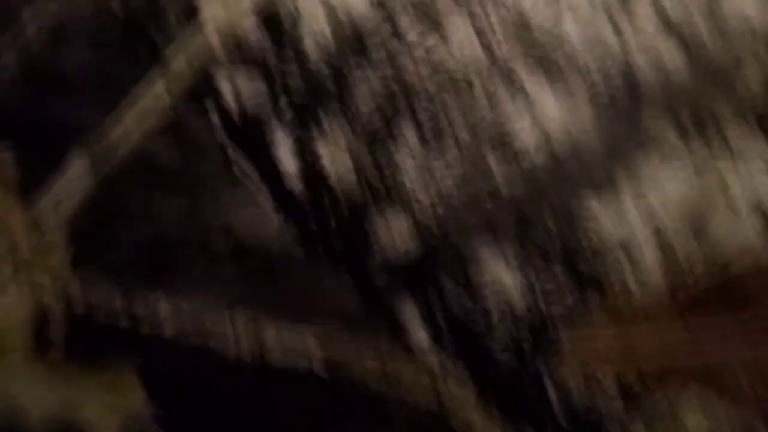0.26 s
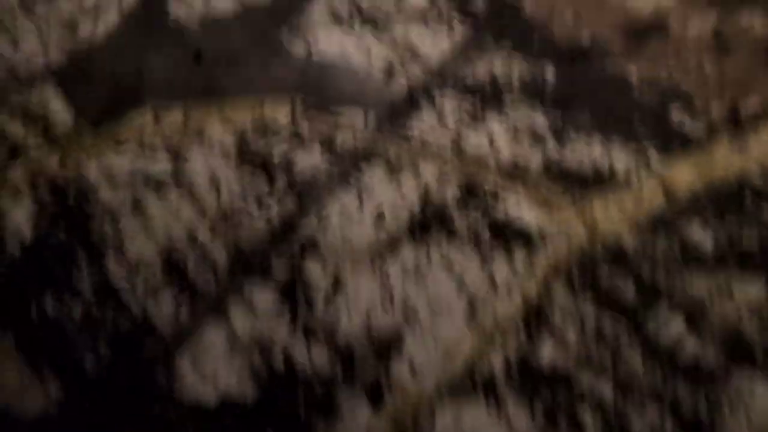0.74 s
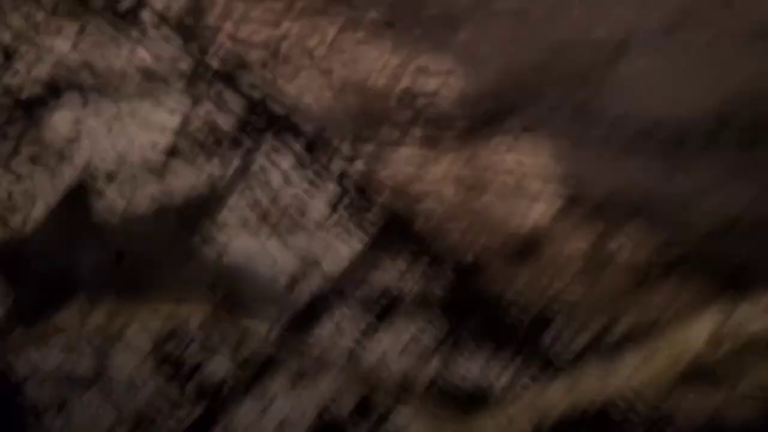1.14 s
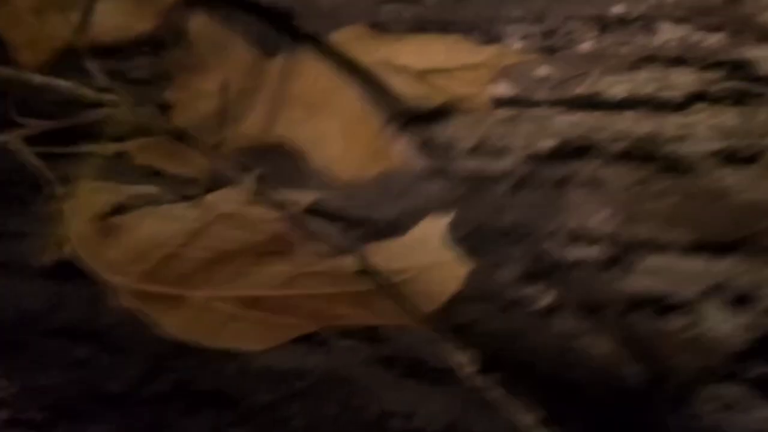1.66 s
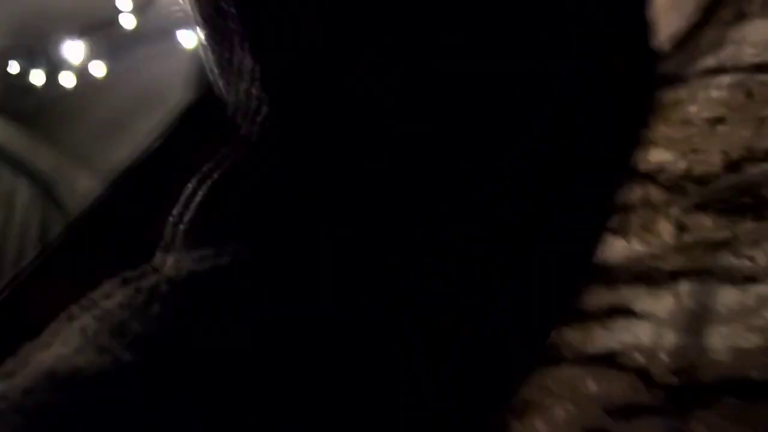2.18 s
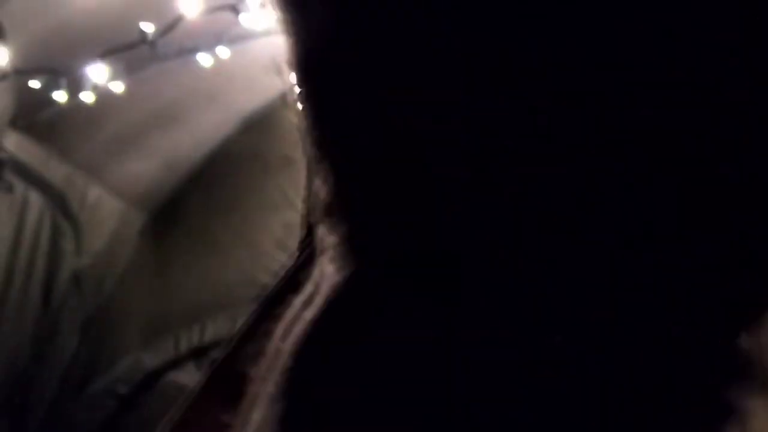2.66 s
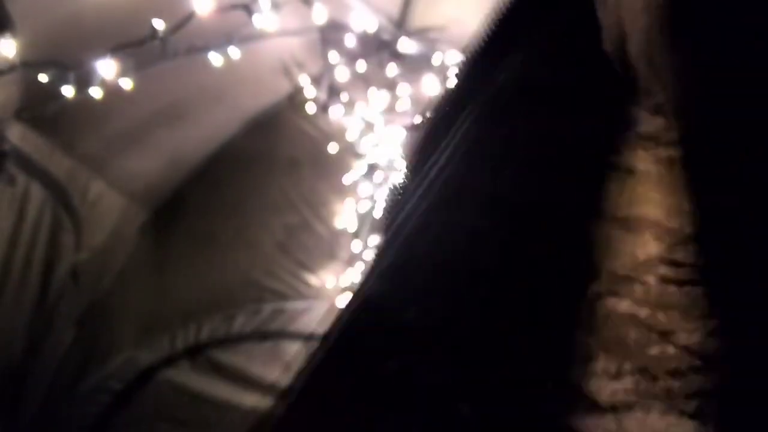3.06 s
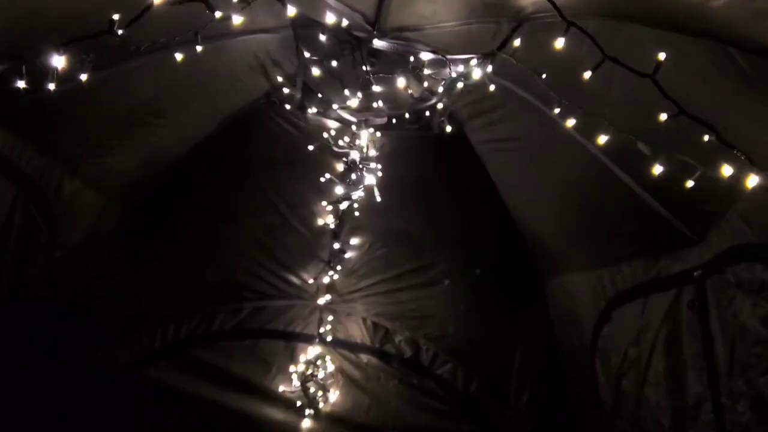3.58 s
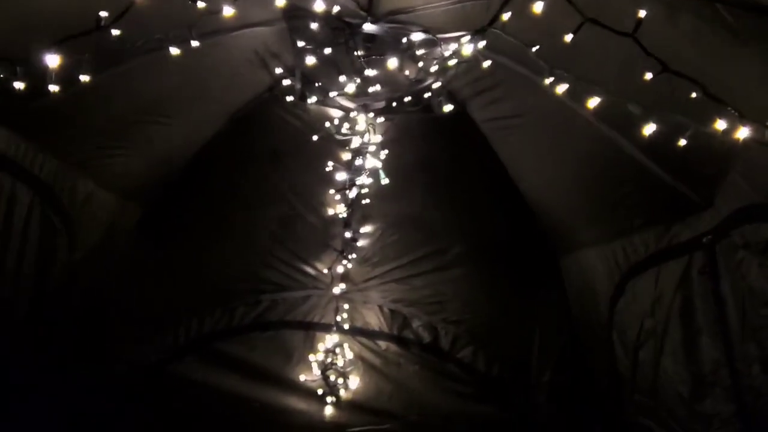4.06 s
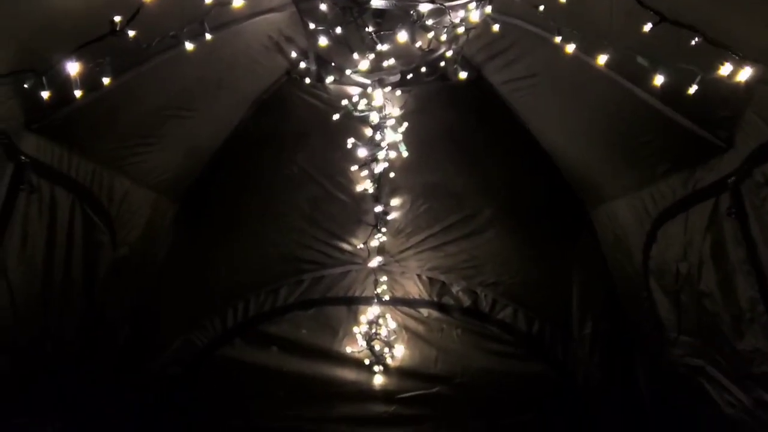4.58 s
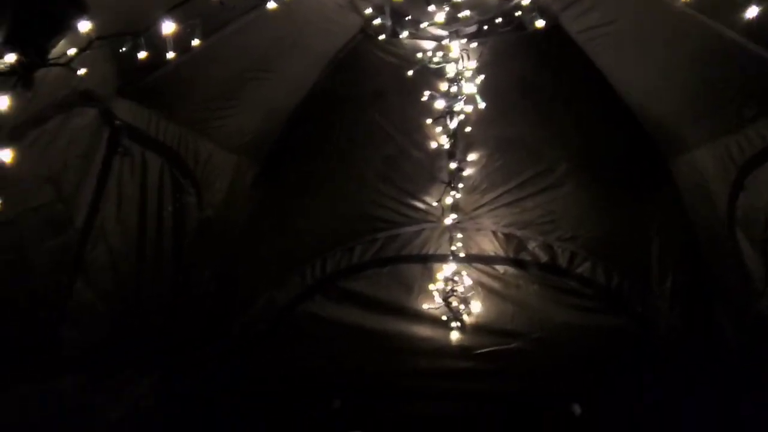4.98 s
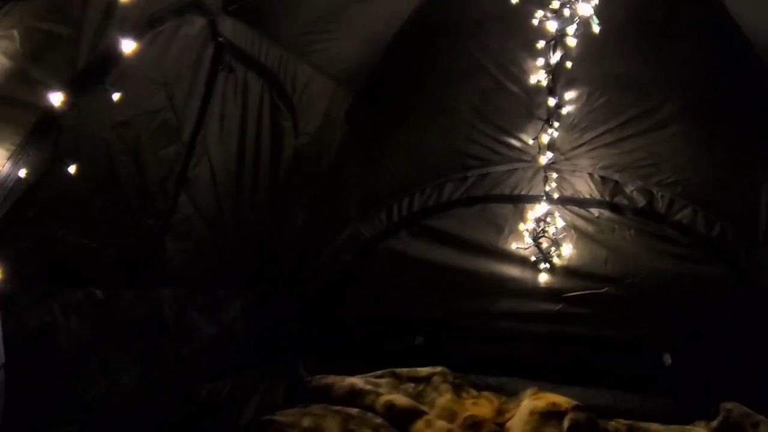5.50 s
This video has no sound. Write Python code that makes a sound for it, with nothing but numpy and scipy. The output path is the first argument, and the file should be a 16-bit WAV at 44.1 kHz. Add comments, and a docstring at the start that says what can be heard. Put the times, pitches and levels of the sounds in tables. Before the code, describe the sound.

A tent door zipper is pulled open in one fast buzzing zip, then slower, rougher pulls, with fabric rustling and flapping.

```python
"""A tent door zipper is pulled open: a long fast zip, then a slower, rougher one.
Each tooth thuds into the taut tape and ticks in the slider; in the fast zip the blows merge into a tone.
Around it the cloth hisses by friction, snaps and flaps, over faint outdoor air.
Two microphone ports hear the scene from close by. Levels in the tables are relative."""
import sys
import numpy as np
from scipy import signal
from scipy.fft import rfft, irfft, next_fast_len
from scipy.io import wavfile
from scipy.ndimage import uniform_filter1d, map_coordinates

SR = 44100
rng = np.random.default_rng(int(sys.argv[2]) if len(sys.argv) > 2 else 0)


def persist_wave(psi):
    """Save psi, clipped to +-1, as 16-bit WAV."""
    counts = np.round(np.clip(psi, -1, 1) * 32767).astype(np.int16)
    wavfile.write(sys.argv[1], SR, np.atleast_2d(counts).T)


N = 253134

# Strokes of rubbing cloth: t/s, hiss level/dB, body level/dB
RUBBING = [(0.0, -58.5, -69), (0.11, -70, -77), (0.21, -57.5, -71), (0.27, -61, -83), (0.45, -49, -58.5),
           (0.7, -34.5, -50), (0.85, -45, -49), (1.2, -39.5, -45), (1.32, -35, -40), (1.9, -36, -39),
           (1.97, -41, -37), (2.03, -38.5, -35.5), (2.16, -41.5, -32.5), (2.25, -50, -41), (2.28, -42, -36),
           (2.38, -58, -52), (2.51, -50.5, -47), (2.54, -64.5, -58), (2.62, -79, -62), (2.68, -54, -66),
           (2.73, -55.5, -58), (2.78, -37, -37.5), (2.81, -47, -53), (2.91, -48.5, -49),
           (3.04, -59.5, -54.5), (3.075, -49, -56), (3.1, -48, -48), (3.15, -37.5, -30.5),
           (3.29, -43.5, -33.5), (3.37, -36.5, -24.5), (3.5, -42, -39), (3.69, -41, -42),
           (3.82, -34.5, -41), (4.0, -41.5, -39.5), (4.05, -49, -54), (4.12, -58, -59), (4.16, -50, -56),
           (4.172, -44, -49), (4.25, -65.5, -58.5), (4.46, -61, -55.5), (4.51, -66, -63),
           (4.54, -51.5, -68.5), (4.58, -61.5, -73), (4.61, -49, -60.5), (4.74, -43.5, -63),
           (4.82, -36, -54), (4.9, -36, -59.5), (5.07, -45.5, -61), (5.2, -45.5, -78), (5.24, -59, -92),
           (5.31, -59, -49.5), (5.42, -77.5, -67), (5.56, -85, -90), (5.62, -65.5, -74), (5.64, -50.5, -57),
           (5.74, -53.5, -57)]
# Direction of the action: t/s, treble level left over right/dB, lead of the left port/ms
DIRECTION = [(0, 8, 0.5), (0.4, 4.5, 0.36), (1.2, 10.5, 0.42), (1.75, 7.5, .41), (2.25, 5.5, 0.18),
             (2.75, 4, 0.19), (3.24, 7.5, 0.013), (3.6, 0, -0.23), (4.25, 3, -0.16), (4.8, 1, 0.06),
             (5.25, 3, .16), (5.74, 4.5, 0.2)]
# Resonances of the slider: f/Hz, bandwidth/Hz, level/dB
SLIDER_MODES = [(950, 600, 0), (1710, 850, 7), (3720, 560, 2.5), (6600, 330, -16.5)]


def amp(db):
    """Amplitude ratio: a factor of ten per 20 dB."""
    return 10 ** (np.asarray(db) / 20)


def unit(x):
    """Normalisation to an RMS of one."""
    return x / np.sqrt(np.mean(x ** 2) + 1e-20)


def curves(rows):
    """Linear interpolation of each column after the time, one value per sample."""
    times, *columns = np.transpose(rows)
    return [np.interp(np.arange(N) / SR, times, column) for column in columns]


def wobble(rate):
    """Smooth random modulation: a spline through rate Gaussian knots a second."""
    knots = rng.standard_normal(int(N * rate / SR) + 4)
    return map_coordinates(knots, [np.arange(N) * rate / SR], order=2)


def filtered(x, response):
    """Linear filtering: the spectrum of x times a frequency response."""
    size = next_fast_len(N + SR // 2)
    return irfft(rfft(x, size) * response(np.fft.rfftfreq(size, 1 / SR)), size)[..., :N]


def colour(points):
    """Minimum-phase response through (f/Hz, level/dB) points, by folding the cepstrum."""
    f, db = np.transpose(points)
    def response(hz):
        magnitude = amp(np.interp(np.log(hz + 1), np.log(f + 1), db))
        cepstrum = irfft(np.log(magnitude + 1e-6))
        cepstrum[1:len(hz) - 1] *= 2
        cepstrum[len(hz):] = 0
        return np.exp(rfft(cepstrum))
    return response


def modes(table):
    """Modal superposition: the response of damped resonances of alternating sign."""
    return lambda f: sum((-1) ** k * amp(db) * 1j * f * width / (f0 * f0 - f * f + 1j * f * width)
                         for k, (f0, width, db) in enumerate(table))


def flicker_noise(spectrum, depth_db, rate, channels=3):
    """Amplitude modulation: noise of flickering strength, shaped to a spectrum."""
    noise = rng.standard_normal((channels, N)) * amp(depth_db * wobble(rate))
    return unit(filtered(noise, colour(spectrum)))


def placed(x, pan_db, diffuse):
    """Path difference: the nearer port hears x louder and earlier; each adds its own diffuse sound."""
    shift = curves(DIRECTION)[1] / 2 * SR / 1000
    direct = np.array([map_coordinates(x, [np.arange(N) + side * shift], order=3) for side in (1, -1)])
    return (direct + diffuse) * amp([pan_db / 2, -pan_db / 2])


def low_pan_db():
    """The level difference of the low range follows the time difference between the ports."""
    lead_ms = curves(DIRECTION)[1]
    return 2.5 + 13 * lead_ms


def outdoor_air():
    """Ambient noise: a faint floor, incoherent between the ports."""
    # Spectrum of the air: f/Hz, level/dB
    spectrum = [(88, -24), (150, -5.5), (383, -3.5), (523, -30), (1590, -16.5), (2090, -37), (4470, -37),
                (11200, -23.5), (15900, -42)]
    return amp(-70.5) * flicker_noise(spectrum, depth_db=-2.5, rate=20, channels=2)


def wall_flap():
    """Volume displacement: the loose wall pumps air in slow lumps, nearly alike at both ports."""
    # Motion of the whole wall: t/s, level/dB
    motion = [(0.0, -54), (0.2, -58.5), (0.38, -58.5), (0.8, -46), (1.34, -43), (1.77, -41), (1.89, -45),
              (2.0, -33.5), (2.5, -39.5), (2.62, -50.5), (2.74, -59), (2.79, -29), (2.87, -34.5),
              (2.92, -45), (3.04, -52), (3.09, -42), (3.13, -29.5), (3.3, -30.5), (3.45, -34.5), (3.6, -31),
              (3.92, -25.5), (4.04, -46), (4.14, -51), (4.4, -59), (4.62, -65), (4.86, -49), (5.24, -55.5),
              (5.33, -47), (5.42, -49.5), (5.5, -59.5), (5.7, -53), (5.74, -55)]
    # Single swings of the wall: t/s of the peak, level/dB
    swings = [(1.49, -51), (1.77, -35), (2.09, -52), (2.33, -49), (2.46, -36), (2.78, -28), (2.855, -36.5),
              (3.72, -33), (3.92, -31), (4.01, -32), (4.19, -34.5), (4.65, -46.5), (4.78, -41), (5.16, -53),
              (5.66, -49)]
    # Spectrum of the pumped air: f/Hz, level/dB
    spectrum = [(12, -44.5), (20, -19.5), (65, 4.5), (86, 2.5), (124, -5.5), (151, -6), (209, -11),
                (250, -14), (320, -26), (550, -120)]
    rise_db_per_s, fall_db_per_s = 494, 230
    t = np.arange(N) / SR
    swing = sum(amp(db - np.maximum(rise_db_per_s * (s - t), fall_db_per_s * (t - s))) for s, db in swings)
    envelope = amp(curves(motion)[0] + 2.2 * wobble(14)) + swing
    boom = envelope * flicker_noise(spectrum, depth_db=1, rate=28)
    return (0.65 * boom[0] + 0.34 * boom[1:]) * amp([[-0.8], [0.8]])


def shifting_folds(hiss, depth_db):
    """Time-varying filtering: folds colour the hiss in patches; a faster rub tilts it to the treble."""
    # Brightness of the rub: t/s, treble level/dB, scaled below into a slope
    sheen = [(0, -0.5), (.7, -7.5), (1.26, 1.5), (2, -0.5), (2.4, -6), (3.2, -4), (3.7, -1), (3.97, -5),
             (4.3, -12), (4.72, 4.5), (5, -1), (5.74, -3.5)]
    hz, t, spectra = signal.stft(hiss, SR, nperseg=256)
    patches = uniform_filter1d(rng.standard_normal(spectra.shape[1:]), size=5, axis=0)
    patches = unit(uniform_filter1d(patches, size=20, axis=1))
    slope = 0.43 * (np.interp(t, *np.transpose(sheen)) - 2)
    tilt_db = slope * np.log2((hz[:, None] + 500) / 6500)
    return signal.istft(spectra * amp(depth_db * patches + tilt_db), SR, nperseg=256)[1][:, :N]


def cloth_rub():
    """Friction noise of catching fibres: hiss, scuff and body; the higher, the less alike at the ports."""
    # Spectrum of the fine hiss: f/Hz, level/dB
    hiss_band = [(1180, -19), (2000, -7), (2710, 0), (4520, -2.5), (6450, -2.5), (7410, -4.5), (8970, -1),
                 (12300, -0.5), (13700, -1), (15000, -2.5), (15900, -1.5)]
    # Spectrum of the midrange scuff: f/Hz, level/dB
    scuff_band = [(400, -34), (800, -3.5), (1300, 1.5), (2100, -1.5), (3000, -23), (5000, -17)]
    # Spectrum of the dull body: f/Hz, level/dB
    body_band = [(90, -25), (170, -4), (300, -2), (520, -1), (800, -4), (1500, -37.5)]
    # Extra scuff where the rub is coarser: t/s, level/dB
    coarseness = [(0, -3), (1.0, 3), (1.5, -0.5), (2.2, 1.5), (2.7, 1), (3.3, -2.5), (3.8, -4), (3.95, 5.5),
                  (4.17, -0.5), (4.27, 11.5), (4.5, -1), (4.75, 0), (4.9, -4.5), (5.24, -8), (5.32, 7),
                  (5.42, -3), (5.62, -1), (5.7, 9.5), (5.74, -1)]
    hiss_db, body_db = curves(RUBBING)
    scuff_db = body_db + 0.73 * (hiss_db - body_db) + curves(coarseness)[0]
    hiss_gain = amp(hiss_db + 1.06 * wobble(25))
    hiss = hiss_gain * shifting_folds(flicker_noise(hiss_band, depth_db=0.5, rate=1200), depth_db=2)
    scuff = amp(scuff_db - 3.5 + 2.46 * wobble(30)) * flicker_noise(scuff_band, depth_db=1, rate=400)
    body = amp(body_db - 3.5 + 4.16 * wobble(40)) * flicker_noise(body_band, depth_db=2.5, rate=150)
    # Channel 0 reaches both ports, the others one port each.
    treble_pan_db = curves(DIRECTION)[0]
    upper = placed(0.5 * hiss[0] + 0.72 * scuff[0], treble_pan_db, 1.345 * hiss[1:] + 0.81 * scuff[1:])
    return upper + placed(0.9 * body[0], low_pan_db(), 0.37 * body[1:])


def snaps():
    """Impulse excitation: each snap is a loosely pitched crack and a thump in the modes of the wall."""
    # Snaps of cloth and slider: t/s, crack level/dB, f/Hz, thump level/dB
    events = [(0.2644, -38, 3700, -69), (0.4353, -38, 2830, -54), (1.45, -17, 2008, -46),
              (1.7161, -20, 2117, -40), (2.2669, -28, 3210, -26), (2.2977, -31, 3300, -36),
              (2.4395, -42.5, 1340, -22.5), (2.4992, -38.5, 1220, -29), (2.5862, -52.5, 890, -44),
              (2.7443, -40.5, 1500, -50), (2.758, -48, 1470, -35), (2.7789, -30, 3500, -8),
              (2.806, -39.5, 3380, -24), (2.856, -35, 1280, -43), (3.08, -35.5, 3700, -23),
              (3.1107, -31.5, 3726, -31), (3.1362, -37.5, 1340, -18.5), (3.182, -27.5, 1380, -30),
              (3.3762, -25.5, 1629, -39), (3.4756, -24, 1361, -33), (3.6157, -35, 1317, -17),
              (3.8231, -22.5, 3878, -15), (3.857, -24, 3787, -25), (3.9226, -21.5, 1218, -16),
              (3.934, -21, 1370, -17), (4.0195, -28, 2072, -27), (4.067, -31, 1202, -43),
              (4.1692, -29.5, 2590, -42), (4.3283, -53, 746, -36), (4.3861, -44.5, 3200, -45),
              (4.4295, -44, 4160, -44.5), (4.529, -44, 3840, -59), (4.594, -38, 9800, -44),
              (4.7804, -35, 9000, -41), (5.255, -47, 2670, -62), (5.312, -43.5, 1390, -33.5),
              (5.631, -48.5, 1400, -53), (5.664, -39, 1670, -53), (5.695, -36, 3260, -59)]
    # Resonances of the wall: f/Hz, bandwidth/Hz, level/dB
    wall_modes = [(72, 18, -28), (143, 49, -2.5), (270, 80, -1), (474, 290, -8.5)]
    ring_t60_s, burst_t60_s = 0.014, 0.012
    cracks, blows = np.zeros((2, N + SR)), np.zeros(N)
    t = np.arange(SR // 40) / SR
    for s, db, hz, thump_db in events:
        start = round(s * SR)
        pan_db = np.interp(s, *np.transpose(DIRECTION)[:2])
        phase_drift = np.cumsum(rng.normal(0, 0.36, len(t)))
        ring = 0.97 * np.sin(2 * np.pi * hz * t + phase_drift) * amp(-60 * t / ring_t60_s)
        burst = 0.6 * rng.standard_normal((2, len(t))) * amp(-60 * t / burst_t60_s)
        cracks[:, start:start + len(t)] += amp([[db + pan_db / 2], [db - pan_db / 2]]) * (ring + burst)
        blows[start] = amp(thump_db + 36.5)
    thumps = filtered(blows, lambda f: modes(wall_modes)(f) / (1 + 1j * f / 600) ** 2)  # soft: low-passed
    return cracks[:, :N] + thumps


def sliding(pulls):
    """Time window with soft ends: one while the slider moves."""
    t = np.arange(N) / SR
    moving = sum((t >= pull[0][0]) & (t < pull[-1][0]) for pull in pulls)
    return uniform_filter1d(moving.astype(float), size=400)


def slow_zip():
    """Jittered impulse train: each tooth strikes tape and slider; an uneven pull scatters the blows."""
    # Two slow pulls, each with rows of: t/s, tooth rate f/Hz, thud level/dB, unevenness/1
    pulls = [
        [(1.94, 265.1, -37, .25), (2.02, 301.6, -32.5, 0.08), (2.062, 250.5, -41.5, 0.19),
         (2.102, 276.5, -23, 0.05), (2.128, 240.6, -32.5, 0.08), (2.19, 175.5, -38, 0),
         (2.296, 90.2, -48, 0.32), (2.37, 88.5, -51, 0.48), (2.508, 76.9, -40, 0.45), (2.54, 75.4, -56, 0.28)],
        [(3.1, 88.8, -54, 0.2), (3.126, 114, -28, .4), (3.176, 181.4, -42, 0.32), (3.2, 209.2, -27.5, 0.41),
         (3.26, 182, -26, 0.23), (3.288, 198, -20.5, 0.16), (3.352, 281, -15.5, .08), (3.374, 552, -15.5, 0.08),
         (3.43, 425.6, -26.5, 0.2), (3.46, 388.7, -32.5, 0.31), (3.5, 154.8, -41.5, 0.2),
         (3.548, 258.2, -31, 0.43), (3.608, 123.1, -36, 0.39), (3.716, 84.65, -36.5, 0.46),
         (3.77, 204.4, -27, 0.2), (3.796, 422.5, -23, 0.19), (3.85, 289.2, -25, 0.25),
         (3.916, 131.3, -33, 0.36), (3.98, 263.2, -36, 0.45), (4.016, 183, -32.5, 0.34),
         (4.05, 110.8, -76, 0.42)],
    ]
    # Response of the taut tape: f/Hz, level/dB
    tape = [(20, -60), (60, -20.5), (150, -1), (300, -1.5), (520, -2), (800, -14.5), (1300, -19.5),
            (3000, -60.5), (16000, -54)]
    tooth_hz, thud_db, uneven = curves(np.concatenate(pulls))
    tick_db = curves(RUBBING)[0] - 3.5
    passed = np.cumsum(tooth_hz / SR)
    jitter, thud_scatter, tick_scatter = rng.standard_normal((int(passed[-1]), 3)).T
    due = np.interp(np.arange(len(jitter)), passed, np.arange(N))
    spread = (0.6 * uneven * SR / tooth_hz)[due.astype(int)]
    hits = np.clip(due + spread * jitter, 0, N - 1).astype(int)
    strength = sliding(pulls)[hits] * np.sqrt(SR / tooth_hz[hits])  # power independent of tooth rate
    def blows(db, scatter):
        return np.bincount(hits, strength * amp(db[hits] + 10 * uneven[hits] * scatter), N)
    thuds = amp(13.5) * filtered(blows(thud_db, thud_scatter), colour(tape))
    ticks = filtered(blows(tick_db, 1.3 * tick_scatter), modes(SLIDER_MODES))
    return thuds + ticks


def fast_zip():
    """Periodic excitation: teeth drive harmonics in the tape and scrape puffs of noise into the slider."""
    # The fast pull: t/s, tooth rate f/Hz, level/dB of fundamental, of octave, of higher harmonics
    pull = [(0.42, 252.2, -78, -64, -79), (0.488, 300, -60, -56, -56), (0.528, 324.8, -72, -62, -57.5),
            (0.6, 415, -48.5, -49, -51), (0.684, 555, -45.5, -52, -62), (0.738, 627, -53, -36, -42),
            (0.8, 547.5, -57, -45, -38.5), (0.864, 459.4, -56, -36, -46.5), (0.97, 440, -60, -36.5, -44),
            (1.0, 469.4, -55, -44, -38), (1.07, 519, -42, -35, -41), (1.1, 566, -54, -44, -41),
            (1.174, 605, -42, -44, -39), (1.198, 532.6, -48, -35, -33.5), (1.225, 515, -48, -38, -50),
            (1.244, 448.6, -38, -36, -46), (1.32, 535.8, -34.5, -32, -33), (1.36, 501, -36.5, -35, -34.5),
            (1.446, 365, -33, -39, -40.5), (1.514, 403, -39.5, -49, -38), (1.57, 406.7, -33.5, -43, -36),
            (1.59, 384.5, -38, -40, -47), (1.648, 449, -33.5, -45, -38), (1.714, 310, -46, -40, -58),
            (1.772, 267, -44, -55.5, -52), (1.818, 316.7, -49, -40, -51), (1.86, 562.5, -29.5, -54, -50),
            (1.884, 691.5, -48, -31.5, -39), (1.912, 612, -54, -33, -28), (1.94, 467.6, -53, -36, -55)]
    # Resonances that lift the harmonics crossing them: f/Hz, bandwidth/Hz, level/dB
    formants = [(1280, 420, 1), (1864, 810, 4)]
    # Ringing of the small teeth: t/s, level/dB
    ringing = [(0.42, -68.5), (0.66, -57.5), (0.856, -61.5), (1.26, -39.5), (1.65, -38.5), (1.834, -31.5),
               (1.94, -50)]
    # Resonance of the teeth: f/Hz, bandwidth/Hz, level/dB
    tooth_modes = [(6360, 630, 0)]
    tooth_hz, fundamental_db, octave_db, upper_db = curves(pull)
    wavering_hz = uniform_filter1d(tooth_hz, size=500) * (1 + 0.0122 * wobble(60))
    phase = 2 * np.pi * np.cumsum(wavering_hz) / SR + 0.13 * wobble(300)
    tone = amp(fundamental_db + 5 + 2.2 * wobble(70)) * np.sin(phase)
    tone += amp(octave_db + 3 * wobble(70)) * np.sin(2 * phase + 0.49 * wobble(160))
    for k in range(2, 6):  # overtone k is harmonic k + 1
        flicker_db = (2.2 + 0.8 * k) * wobble(70) + 1.8 * wobble(14.13)
        resonance = abs(modes(formants)((k + 1) * tooth_hz)) ** 2
        phase_blur = 0.55 * k ** 1.15 * wobble(160)
        tone += amp(upper_db - 2 * k + flicker_db) * resonance * np.sin((k + 1) * phase + phase_blur)
    puffs = rng.standard_normal(N) * amp(23 * np.cos(phase) + 3.1 * wobble(120))  # one per tooth
    rasp = amp(curves(RUBBING)[0] - 5.5) * unit(filtered(puffs, modes(SLIDER_MODES)))
    sizzle = amp(curves(ringing)[0] - 2.5) * unit(filtered(puffs, modes(tooth_modes)))
    return sliding([pull]) * (tone + rasp + sizzle)


def scene():
    """Superposition of all sources; folds of cloth scatter a little of the zipper to each port."""
    teeth = fast_zip() + slow_zip()
    taps, scatter_t60_s = SR // 30, 0.049
    echoes = rng.standard_normal((2, taps)) * amp(-60 * np.arange(taps) / SR / scatter_t60_s)
    scattered = signal.fftconvolve(teeth[None], unit(echoes) / np.sqrt(taps), axes=1)[:, :N]
    zipper = placed(teeth, low_pan_db(), amp(-12) * scattered)
    return outdoor_air() + wall_flap() + cloth_rub() + snaps() + zipper


def record(dry):
    """Frequency response of the microphone: each port has its own colour, and both are band-limited."""
    # Left port over right: f/Hz, level/dB
    imbalance = [(30, 4.5), (125, -0.5), (500, 0.5), (1200, -2.5), (2500, .5), (5000, 3), (9000, -3),
                 (14000, -2)]
    band_limit_hz = 15870
    f, db = np.transpose(imbalance)
    def response(hz):
        pan_db = np.interp(np.log(hz + 1), np.log(f), db)
        return amp([pan_db / 2, -pan_db / 2]) * (hz < band_limit_hz)
    return filtered(dry, response)


dry = scene()
out = record(dry)
persist_wave(out)
```